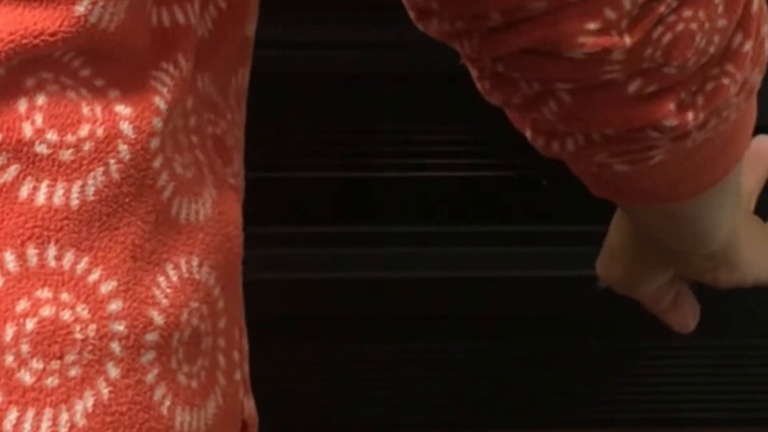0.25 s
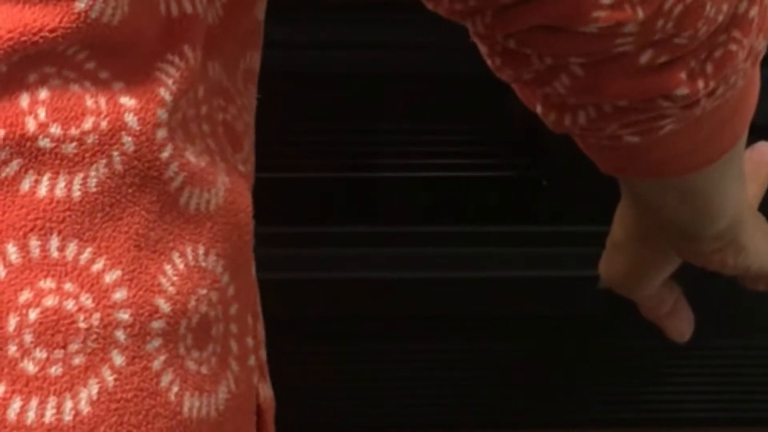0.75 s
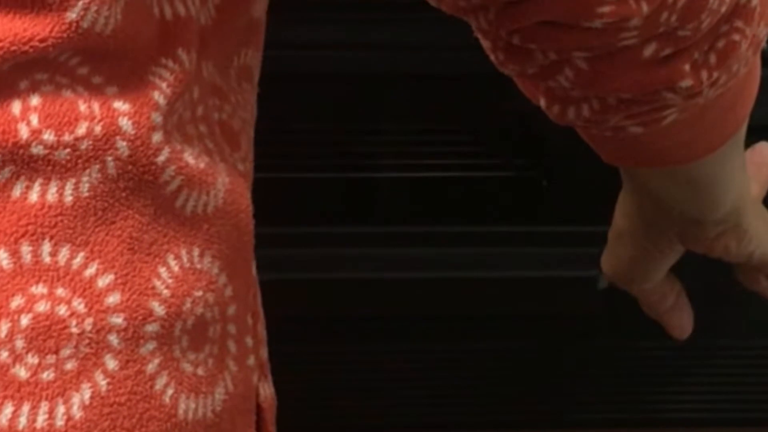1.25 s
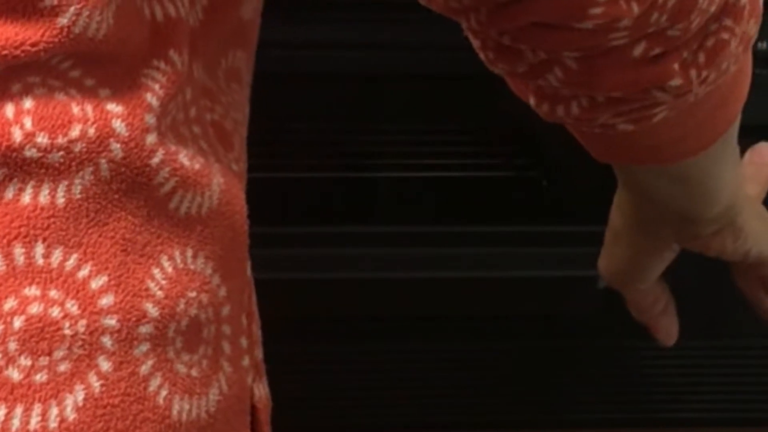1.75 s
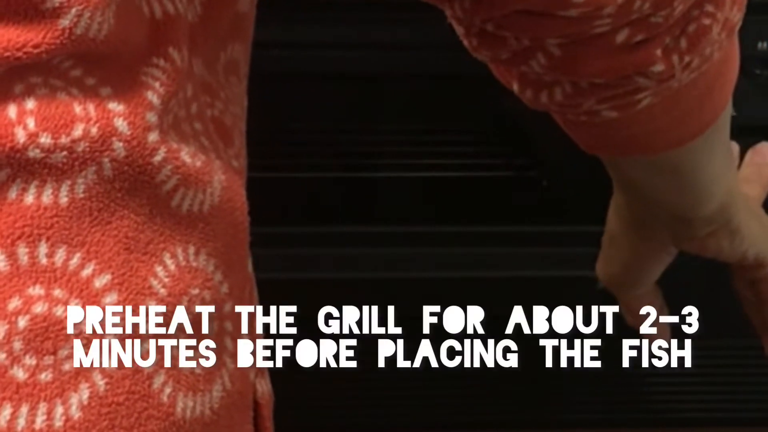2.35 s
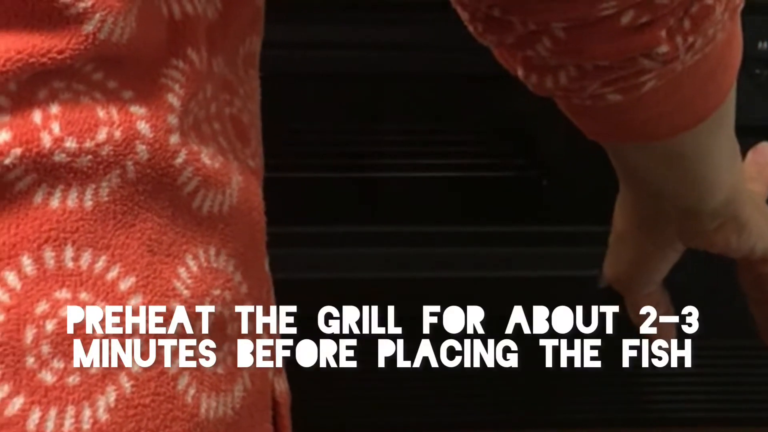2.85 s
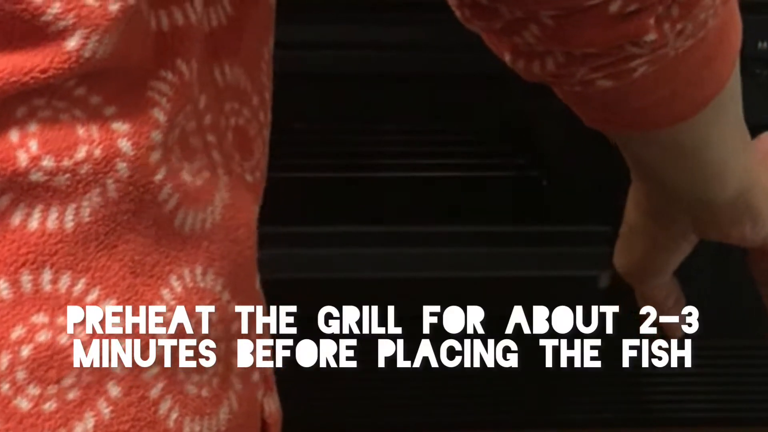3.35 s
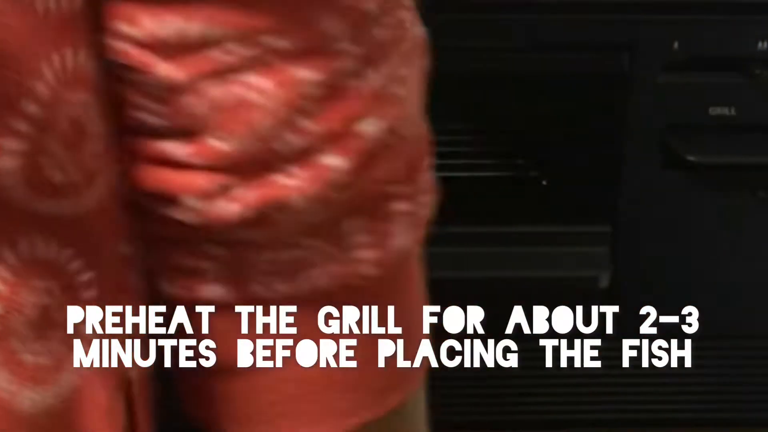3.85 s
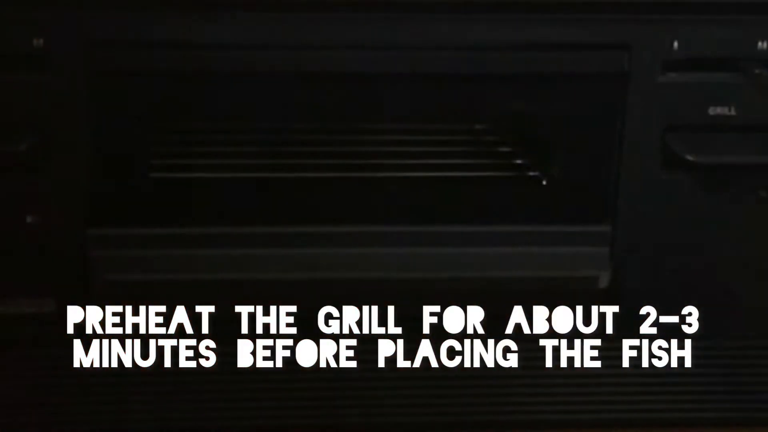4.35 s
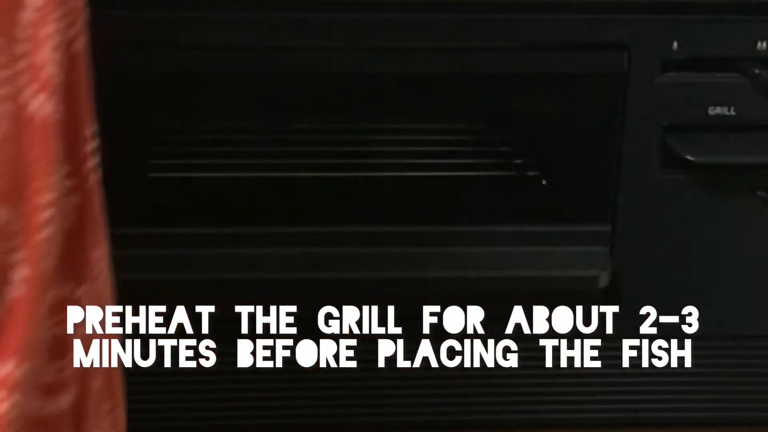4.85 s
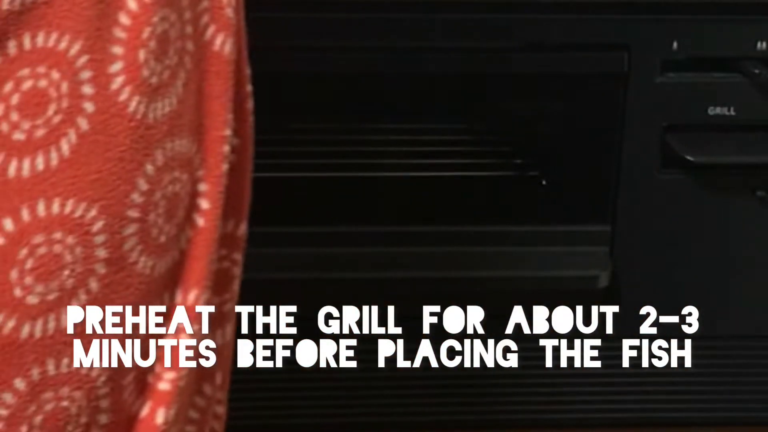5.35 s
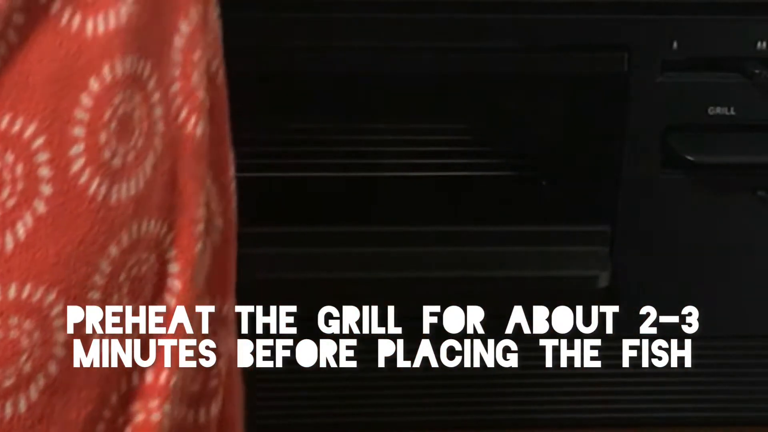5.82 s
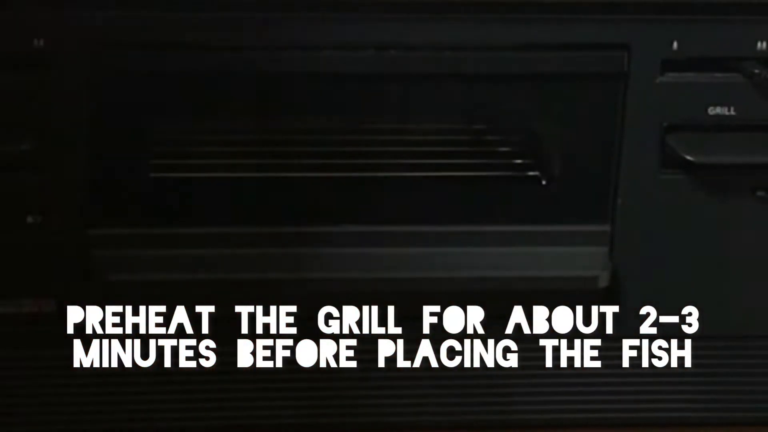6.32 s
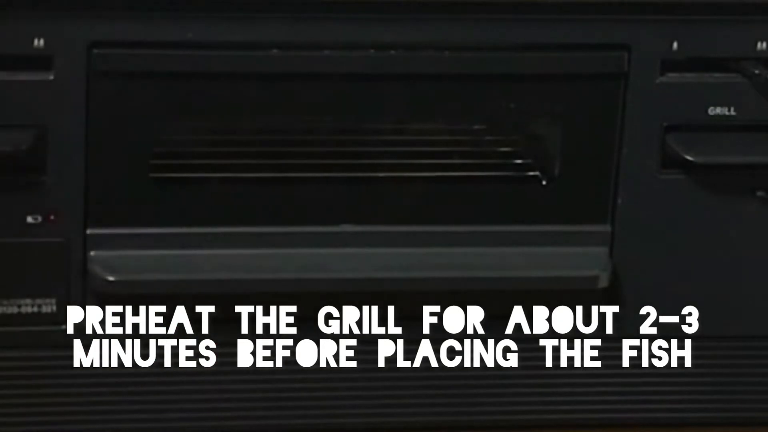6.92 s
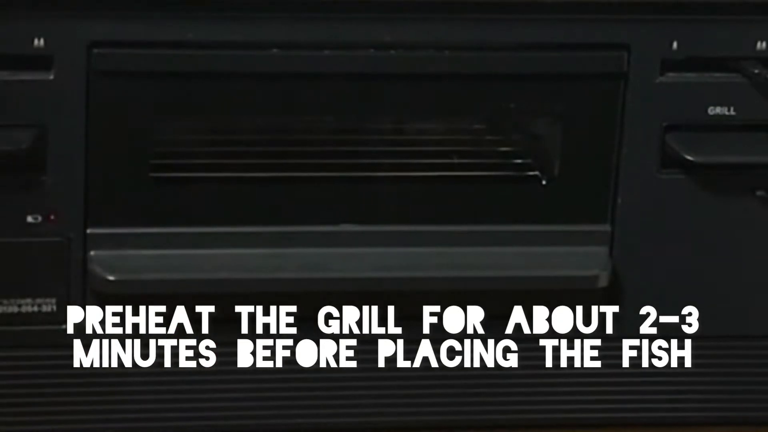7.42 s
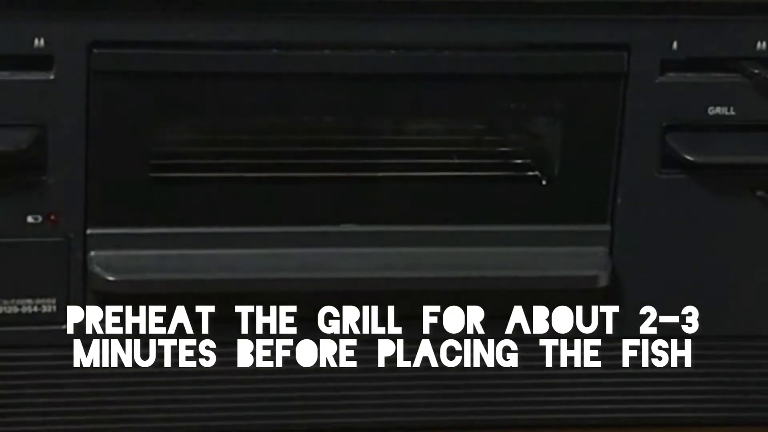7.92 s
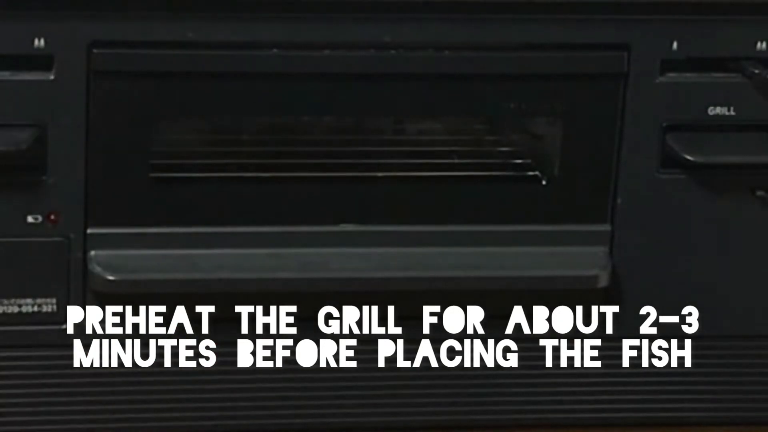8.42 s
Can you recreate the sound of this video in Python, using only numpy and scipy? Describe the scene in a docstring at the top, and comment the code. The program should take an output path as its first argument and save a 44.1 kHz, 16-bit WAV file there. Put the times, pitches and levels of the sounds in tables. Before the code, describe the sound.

Rapid, evenly spaced gas-grill sparks crack in a small kitchen, the control clacks back, slippers shuffle on hollow floor, and a small geared motor whirs.

```python
"""Lighting a gas grill

In a small hard-walled kitchen a control is pushed in, gas hisses as filtered noise, and thirteen sparks,
short decaying oscillations with echoes, precede the control's spring back. Slippers shuffle on a hollow
floor: noise bursts excite its resonances, and swells of noise form the scuffs. A small geared motor
(perhaps a vent flap) clacks in, whirrs for about three seconds as throbbing noise with a hum, and stops."""
import sys
import numpy as np
from scipy import signal
from scipy.fft import rfft, irfft, next_fast_len
from scipy.io import wavfile
from scipy.ndimage import map_coordinates

SR = 44100
rng = np.random.default_rng(int(sys.argv[2]) if len(sys.argv) > 2 else 0)


def generate_wav(sig):
    """Save sig (samples, or channels by samples) to the path in sys.argv[1] as 16-bit PCM at SR."""
    pcm = np.round(np.clip(np.atleast_2d(sig).T, -1, 1) * 32767).astype(np.int16)
    wavfile.write(sys.argv[1], SR, pcm)


N = 382788

# Decay of the kitchen's echoes. Each row: frequency in Hz, time to fall by 60 dB in seconds.
KITCHEN_DECAY = [(100, 0.35), (500, 0.41), (2000, 0.31), (6000, 0.28), (10000, .26), (15000, 0.22)]
# Spectrum of the room air. Each row: frequency in Hz, relative level in dB per Hz.
AIR_SPECTRUM = [(25, -24), (55, 0.5), (76, -6.5), (93, 10), (118, -9.5), (160, -5.5), (290, -5), (450, -13),
                (620, -11), (1000, -14.5), (2800, -21), (7000, -22), (9800, -24.5), (10600, -27),
                (15800, -28.5)]
# Tones of a fan. Each row: frequency in Hz, level in dB.
FAN_TONES = [(93, -97), (581, -70.5), (630, -77)]
# Spectrum of the escaping gas. Each row: frequency in Hz, relative level in dB per Hz.
GAS_SPECTRUM = [(2000, -71), (5000, 5.5), (7500, 13), (9700, 5.5), (10500, -29), (15500, 2.5)]

# Spectrum of a hard contact. Each row: frequency in Hz, relative level in dB per Hz before the tilt.
SNAP_SPECTRUM = [(1500, -44), (2800, -10.5), (3800, -3), (5500, 0), (7000, -2), (9700, -1), (10500, -11.5),
                 (13000, -5.5), (15800, -24)]
# Contacts of the stove's control. Each row: start in seconds, rise time constant in seconds,
# strength in dB, hardness in dB, weight in dB.
CONTROL_CONTACTS = [(.063, 0.0032, -48, 5.5, -2), (.29, 0.036, -56.5, 0.5, 3.5),
                    (.3555, 0.0033, -52, 14.5, -3.5), (.542, 0.0014, -55.5, -5.5, 2.5),
                    (3.141, .003, -63, -1, -5), (3.393, 0.0057, -47.5, .5, 1.5), (3.463, .003, -41, 0, 0.5),
                    (3.520, 0.0011, -37.5, -4, -1)]
# Resonances of the stove's front panel. Each row: frequency in Hz, width in Hz, relative level in dB.
PANEL_MODES = [(185, 33, 5.5), (361, 19, -1), (1200, 52, -5), (1355, 75, -0.5), (2010, 22, -4.5),
               (2490, 60, -6), (2770, 130, -2), (3170, 45, -3), (4210, 210, -5.5), (5380, 160, -9)]
# The panel's thud, knock and clack. Each row: lower edge in Hz, upper edge in Hz,
# level in dB relative to strength, change in dB per dB of hardness.
PANEL_REGISTERS = [(132, 790, -4.5, 0), (830, 1860, -1, 0.1), (1960, 3560, 1.5, -0.09)]

# Footfalls. Each row: start in seconds, rise time constant in seconds,
# strength in dB, hardness in dB, weight in dB.
FOOTFALLS = [(.114, .0037, -50.5, -11, -2.5), (3.774, 0.00092, -52, -2.5, 2), (4.466, 0.00039, -47, 1.5, 2),
             (4.519, 0.0022, -56, 8.5, 2.5), (6.085, 0.012, -52, 1.5, 3), (6.12, 0.0013, -49.5, 0, 1.5),
             (6.668, 0.019, -52.5, 14, -8), (6.756, 0.00081, -51, 1.5, -5), (7.289, .0005, -43, -2.5, -2.5),
             (7.843, 0.0021, -58, 6, 4.5), (8.25, .03, -60, -1, 4.5), (8.6, 0.015, -58, -11, 6.5)]
# Resonances of the hollow floor. Each row: frequency in Hz, width in Hz, relative level in dB.
FLOOR_MODES = [(79, 13, 6), (131, 24, 0), (147, 46, -3), (233, 40, 2), (423, 14, -0.5), (580, 58, -11)]
# The floor's boom and thud, and the sole's slap. Each row: lower edge in Hz, upper edge in Hz,
# level in dB relative to strength, change in dB per dB of hardness.
FLOOR_REGISTERS = [(69, 164, 1, 0), (172, 730, 0, 0), (680, 3640, -3.5, 0.55)]

# Slippers and cloth sliding. Each row: time of the peak in seconds, length in seconds, level in dB.
SCUFF_STROKES = [(0.297, 0.13, -58.5), (3.687, .07, -60.5), (4.356, 0.062, -53), (5.944, 0.042, -50.5),
                 (6.08, 0.16, -56.5), (6.566, 0.086, -42.5), (6.718, 0.062, -37.5), (7.174, 0.074, -50.5),
                 (7.348, 0.079, -48), (7.542, .13, -54), (8.396, 0.15, -42.5), (8.486, 0.098, -46.5),
                 (8.599, 0.11, -40)]
# Spectrum of the sliding hiss. Each row: frequency in Hz, relative level in dB per Hz.
HISS_SPECTRUM = [(1500, -25), (3000, -23), (4500, -10.5), (5600, -1.5), (7800, -0.5), (9800, -8.5),
                 (10600, -13.5), (12500, -14), (15800, -40)]
# Spectrum of the lower rasp. Each row: frequency in Hz, relative level in dB per Hz.
RASP_SPECTRUM = [(200, -29), (600, -24.5), (1500, -11.5), (3000, -9.5), (5000, -13), (9000, -28)]
SCUFF_RISE_SHARE, RASP_DB = 0.55, -8  # share of a stroke spent speeding up; rasp relative to hiss

# Paths of the crack out of the grill and off its nearest walls. Each row: delay in seconds, gain as a factor.
CRACK_PATHS = [(0, 0.37), (.00071, 0.54), (.00142, 0.53)]
# Spectrum of the spark as it fills the room. Each row: frequency in Hz, relative level in dB per Hz.
SPARK_SPECTRUM = [(300, -40.5), (900, -32.5), (1400, -20), (2600, -18), (4300, -9), (5200, -10), (5800, -3),
                  (6600, -5), (9600, -2.5), (10500, -7.5), (12700, -5.5), (15800, -16.5)]
# the igniter recharges at a fixed pace and fires sparks of nearly equal strength
FIRST_SPARK_S, RECHARGE_S, SPARK_COUNT = .8663, .13935, 13
SPARK_DB = -12.8

# Small dry ticks close by. Each row: start in seconds, peak level in dB.
DRY_TICKS = [(4.101, -31.5), (4.467, -22.5), (7.289, -37), (7.843, -32.5)]
# Brief stick-slip squeaks. Each row: time of the peak in seconds, length in seconds, pitch in Hz,
# level of the fundamental in dB, level of its overtone in dB.
STICK_SLIPS = [(5.329, .012, 1500, -48, -68), (8.39, .018, 1480, -52, -60), (8.478, .03, 1670, -44, -48)]

# Clacks as the motor takes up its load and as it stops. Each row: start in seconds,
# rise time constant in seconds, strength in dB, hardness in dB, weight in dB.
LATCH_CLACKS = [(5.3335, 0.017, -43.5, 7, 9.5), (5.405, 0.0098, -45.5, -0.5, -1), (8.125, .003, -59, -1, 0)]
# Resonances of the flap. Each row: frequency in Hz, width in Hz, relative level in dB.
FLAP_MODES = [(382, 89, -9), (540, 22, 8), (1900, 80, 5), (2250, 82, 1), (2600, 220, 6), (5800, 450, -9),
              (8250, 1200, -5)]
# The flap's thud, knock and clack. Each row: lower edge in Hz, upper edge in Hz,
# level in dB relative to strength, change in dB per dB of hardness.
FLAP_REGISTERS = [(130, 1020, -10.5, 0), (885, 1500, -4.5, 0.36), (1820, 3600, 5.5, -0.91)]
# Spectrum of the rubbing gears. Each row: frequency in Hz, relative level in dB per Hz.
GEAR_SPECTRUM = [(200, -7.5), (300, -2), (450, -13), (750, -3), (1150, -6), (1400, -0.5), (1850, 1),
                 (2050, -5), (2700, -2), (3500, -10), (5000, -16.5), (8000, -43)]
# The gears' load: they strain once, early on, then settle. Each row: time in seconds, level in dB.
GEAR_LOAD_CURVE = [(5.75, -56), (5.87, -51.5), (6.02, -58), (7.1, -56.5), (7.65, -56), (7.9, -59)]
# Tones of the motor's coils. Each row: frequency in Hz, level in dB.
COIL_TONES = [(119.5, -64.5), (300.5, -67), (1516, -74), (1863, -69), (1927, -90), (2477, -76.5)]
MOTOR_ON_S, SPIN_UP_S, MOTOR_OFF_S, RUN_DOWN_S = 5.33, 0.061, 8.15, 0.07

TOP_HZ = 15900  # band limit of the whole sound


def amp(db):
    """Level to amplitude: 20 dB is a factor of ten."""
    return 10 ** (np.asarray(db) / 20)


def unit(x):
    """Normalisation to a root-mean-square of 1."""
    return x / np.sqrt(np.mean(x ** 2) + 1e-20)


def seconds(size):
    """Sampled time: sample index over sampling rate."""
    return np.arange(size) / SR


def along(points, hz):
    """Interpolation of (Hz, value) points on a logarithmic frequency axis."""
    f, v = np.transpose(points)
    return np.interp(np.log(hz + 1), np.log(f + 1), v)


def wobble(rate):
    """Slow random fluctuation: a smooth curve through normal values, rate of them a second."""
    knots = rng.standard_normal(int(N * rate / SR) + 4)
    return map_coordinates(knots, [seconds(N) * rate])


def coloured(x, spectrum):
    """Minimum-phase filtering: folding the cepstrum onto positive time gives a causal filter."""
    m = 2 * next_fast_len(len(x))
    level_db = along(spectrum, np.fft.rfftfreq(m, 1 / SR))
    cepstrum = irfft(np.log(amp(level_db)), m)
    cepstrum[1:m // 2] *= 2
    cepstrum[m // 2 + 1:] = 0
    response = np.exp(rfft(cepstrum))
    return irfft(rfft(x, m) * response, m)[:len(x)]


def noise(spectrum):
    """Subtractive synthesis: white noise through a spectrum, at rms 1."""
    return unit(coloured(rng.standard_normal(N), spectrum))


def band(x, lo_hz, hi_hz):
    """Causal band-pass filtering."""
    edges = [lo_hz, min(hi_hz, .49 * SR)]
    sections = signal.butter(N=3, Wn=edges, btype="band", fs=SR, output="sos")
    return signal.sosfilt(sections, x)


def add(track, s, sound):
    """Superposition: a sound is summed into the track from time s."""
    room_left = track[max(round(s * SR), 0):][:len(sound)]
    room_left += sound[:len(room_left)]


def tail(rise=0.00027):
    """Reverberation of energy 1: diffuse noise in which each frequency decays at its own rate."""
    hz, t, z = signal.stft(rng.standard_normal(SR // 2), SR, nperseg=256)
    decay = amp(-60 * t / along(KITCHEN_DECAY, hz)[:, None])
    x = signal.istft(z * decay, SR, nperseg=256)[1][:SR // 2]
    x = x * (1 - np.exp(-seconds(len(x)) / rise))
    return x / np.linalg.norm(x)


def in_room(x, direct_db):
    """Direct and reverberant fields add; dividing by their joint amplitude keeps the power about equal."""
    echoes = signal.fftconvolve(x, tail())[:len(x)]
    return (amp(direct_db) * x + echoes) / np.hypot(1, amp(direct_db))


def tones(lines, drift, rate):
    """Additive synthesis: steady sinusoids whose phases wander by about drift radians."""
    total = np.zeros(N)
    for hz, db in lines:
        phase = 2 * np.pi * hz * seconds(N) + drift * wobble(rate)
        total += amp(db) * np.sqrt(2) * np.sin(phase)
    return total


def resonate(x, modes):
    """Modal resonance: a body responds as a sum of narrow band-passes."""
    return sum(amp(db) * signal.lfilter(*signal.iirpeak(hz, hz / width, fs=SR), x)
               for hz, width, db in modes)


def blows(rows, modes, voice, body_db, crack_db, crack_life, tilt_db, tilt_per_hardness):
    """Impact excitation: a crack and its echoes, coloured by the body; hardness adds snap and
    changes its tilt (dB per octave), weight feeds the lowest register."""
    track, t = np.zeros(N), seconds(SR // 2)
    span = .04 * SR  # each part's level is that of its energy gathered into 40 ms
    for s, rise, strength_db, hardness_db, weight_db in rows:
        crack = rng.standard_normal(len(t)) * amp(-60 * t / crack_life)
        sound = unit(tail()) + amp(crack_db) * unit(crack)
        sound = sound * (1 - np.exp(-t / rise))  # a soft contact builds up slowly
        sound = sound + amp(body_db) * resonate(sound, modes)

        parts = []
        for k, (lo, hi, db, share) in enumerate(voice):
            register_db = db + share * hardness_db + (weight_db if k == 0 else 0)
            parts.append((register_db, band(sound, lo, hi)))

        tilt = tilt_db + tilt_per_hardness * hardness_db
        tilted = [(hz, db + tilt * np.log2(hz / SNAP_SPECTRUM[0][0])) for hz, db in SNAP_SPECTRUM]
        parts.append((hardness_db, coloured(sound, tilted)))

        for db, part in parts:
            add(track, s, amp(strength_db + db) * part * np.sqrt(span / np.sum(part ** 2)))
    return track


def background(air_db=-59, gas_db=-67):
    """Broadband flow noise of air and, once the valve is open, of gas, with a fan's periodic tones."""
    valve = np.interp(seconds(N), [.2, .35], [0, 1])
    gas = valve * amp(gas_db + 0.19 * wobble(3.67)) * noise(GAS_SPECTRUM)
    air = amp(air_db + 0.39 * wobble(18)) * noise(AIR_SPECTRUM)
    fan = tones(FAN_TONES, drift=0.5, rate=12)
    return air + fan + gas


def control():
    """Impacts excite a panel's modes as the control is pushed in and later rattles back against it."""
    return blows(CONTROL_CONTACTS, PANEL_MODES, PANEL_REGISTERS, body_db=8.5, crack_db=2.5,
                 crack_life=0.01, tilt_db=-2, tilt_per_hardness=0.25)


def footsteps():
    """Heels excite the low modes of a hollow floor, and soles slap on it."""
    return blows(FOOTFALLS, FLOOR_MODES, FLOOR_REGISTERS, body_db=3.5, crack_db=-2.0,
                 crack_life=0.018, tilt_db=-5.5, tilt_per_hardness=0.17)


def scuffs(grain_db=2.0):
    """Sliding friction: fibres catch and slip as a sole speeds up and slows, a hiss over a lower rasp."""
    t, sliding = seconds(N), np.zeros(N)
    for s, length, db in SCUFF_STROKES:
        share = np.where(t < s, SCUFF_RISE_SHARE, 1 - SCUFF_RISE_SHARE)
        sliding += amp(db) * np.exp(-((t - s) / (length * share)) ** 2)
    grain = unit(amp(grain_db * wobble(500)))
    texture = noise(HISS_SPECTRUM) + amp(RASP_DB) * noise(RASP_SPECTRUM)
    return in_room(sliding * grain * texture, direct_db=6.5)


def igniter(crack_hz=7200, crack_life=.00007, direct_db=-1.0, room_db=13.5):
    """Impulsive radiation: sparks share their paths through grill and room; a small share
    changes as the arc wanders."""
    wander, arc_scatter_db = .4, .8  # amplitude of the changing echoes; spread of the direct crack
    track, t = np.zeros(N), seconds(SR // 2)
    crack = np.zeros(len(t))
    for delay, gain in CRACK_PATHS:
        age = np.maximum(t - delay, 0)
        crack += gain * np.sin(2 * np.pi * crack_hz * age) * np.exp(-age / crack_life)
    crack = band(np.gradient(crack), 3000, 17300)  # a small source radiates its rate of change
    crack = crack / np.abs(crack).max()
    walls = tail(rise=0.000059)
    for s in FIRST_SPARK_S + RECHARGE_S * np.arange(SPARK_COUNT):
        echoes = coloured(walls + wander * tail(), SPARK_SPECTRUM)
        echoes = echoes / np.linalg.norm(echoes)
        arc = amp(direct_db + arc_scatter_db * rng.standard_normal()) * crack
        add(track, s, amp(SPARK_DB) * (arc + amp(room_db) * echoes))
    return track


def ticks(life=0.0011, room_db=-3):
    """Near-field transients: tiny dry snaps of fast-decaying noise, with weaker echoes."""
    track, t = np.zeros(N), seconds(SR // 2)
    for s, db in DRY_TICKS:
        crack = rng.standard_normal(len(t)) * amp(-60 * t / life)
        snap = band(unit(crack) + amp(room_db) * unit(tail()), 1300, 8600)
        add(track, s, amp(db) * snap / np.abs(snap).max())
    return track


def squeaks():
    """Stick-slip oscillation: surfaces catch for a moment; the pitch is unsteady and rises a little."""
    rough, glide = .9, .8  # phase unsteadiness in radians; share of the pitch gained a second
    t, slips = seconds(N), np.zeros(N)
    for s, length, hz, db, overtone_db in STICK_SLIPS:
        age = t - s
        phase = 2 * np.pi * hz * (age + glide * age ** 2 / 2) + rough * wobble(200)
        wave = amp(db) * np.sin(phase) + amp(overtone_db) * np.sin(2 * phase)
        slips += np.exp(-(age / length) ** 2) * wave
    return in_room(slips, direct_db=7)


def motor(turn_hz=20):
    """Amplitude modulation: gears rub once a turn of the shaft, never twice alike, over the coils' hum."""
    throb_db, uneven_db = 6, 1.8  # depth of the regular throb and of its irregularity
    t = seconds(N)
    spin_up = np.clip((t - MOTOR_ON_S) / SPIN_UP_S, 0, 1)
    run_down = np.clip(1 - (t - MOTOR_OFF_S) / RUN_DOWN_S, 0, 1)
    running = spin_up * run_down
    load = amp(np.interp(t, *np.transpose(GEAR_LOAD_CURVE)))
    turning = np.sin(2 * np.pi * turn_hz * t + 1.0 * wobble(3.24))
    throb = unit(amp(throb_db * turning + uneven_db * wobble(turn_hz)))
    gears = in_room(running * load * throb * noise(GEAR_SPECTRUM), direct_db=-1.5)
    hum = running * tones(COIL_TONES, drift=0.98, rate=5.8)
    latch = blows(LATCH_CLACKS, FLAP_MODES, FLAP_REGISTERS, body_db=0.5, crack_db=3.5,
                  crack_life=0.042, tilt_db=-5, tilt_per_hardness=0.99)
    return gears + hum + latch


def scene():
    """Superposition of all the kitchen's sounds at one microphone."""
    stove_and_steps = igniter() + control() + footsteps()
    small_sounds = ticks() + scuffs() + squeaks()
    return (stove_and_steps + small_sounds + motor() + background())[None]


def record(dry):
    """Band limitation: every component from TOP_HZ upward is removed."""
    m = next_fast_len(N + SR // 2)
    kept = np.fft.rfftfreq(m, 1 / SR) < TOP_HZ
    return irfft(rfft(dry, m) * kept, m)[..., :N]


dry = scene()
out = record(dry)
generate_wav(out)
```